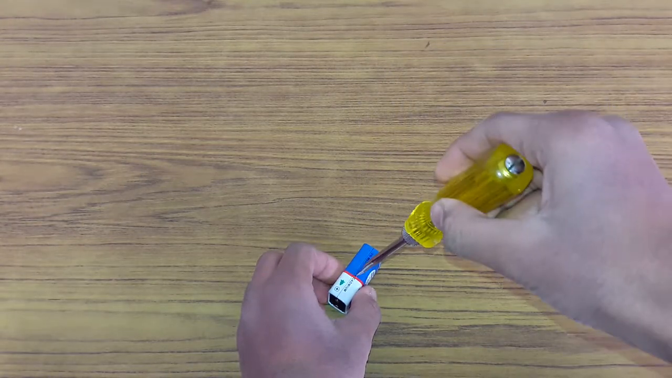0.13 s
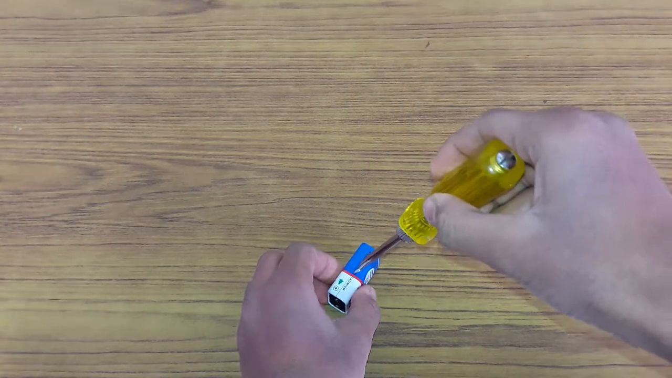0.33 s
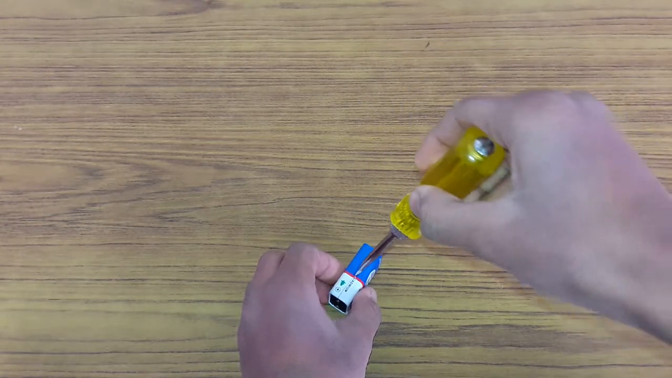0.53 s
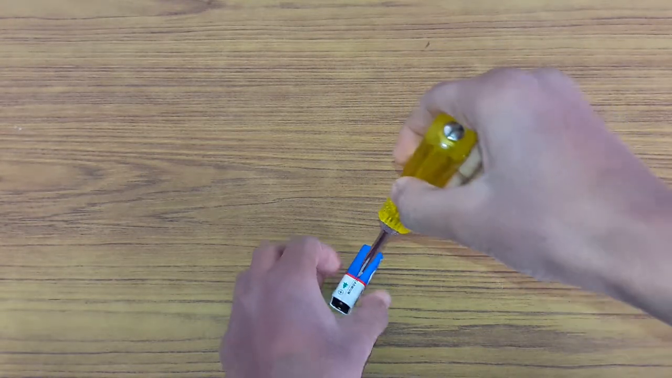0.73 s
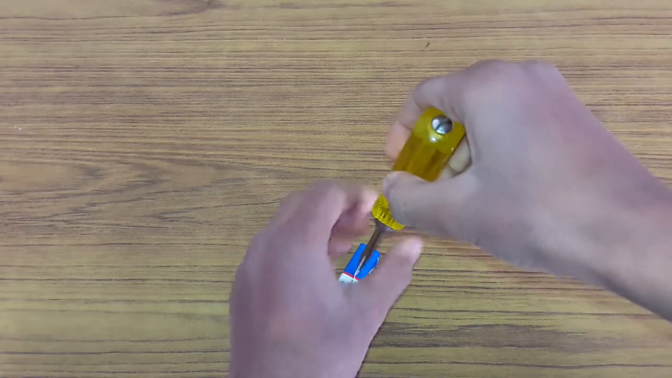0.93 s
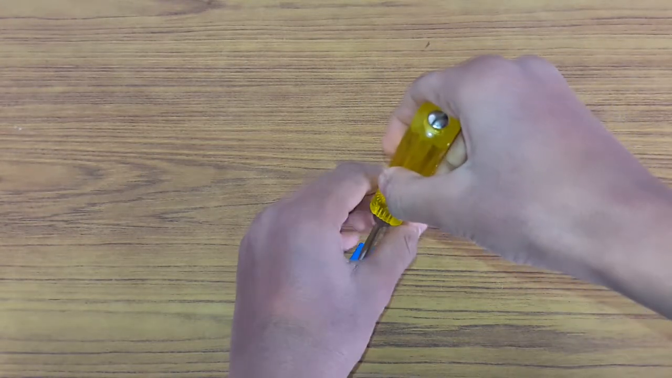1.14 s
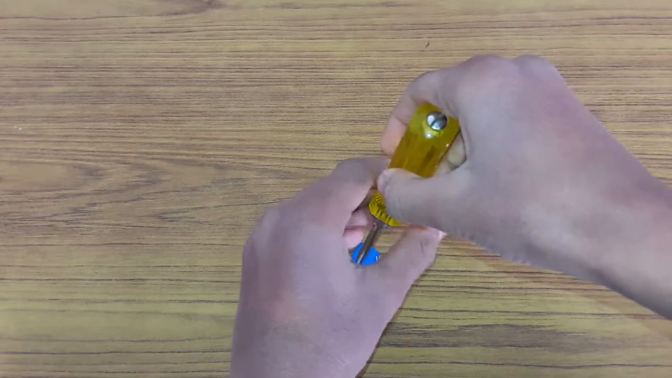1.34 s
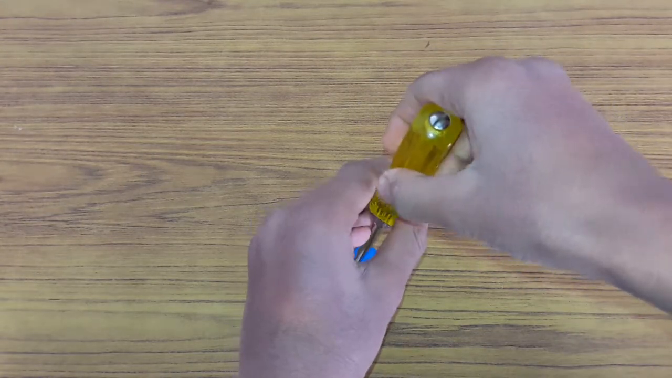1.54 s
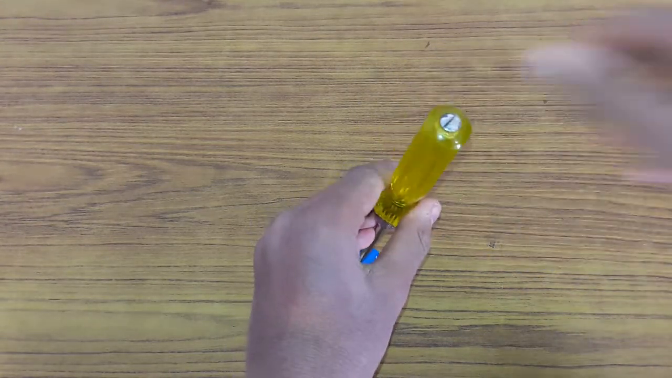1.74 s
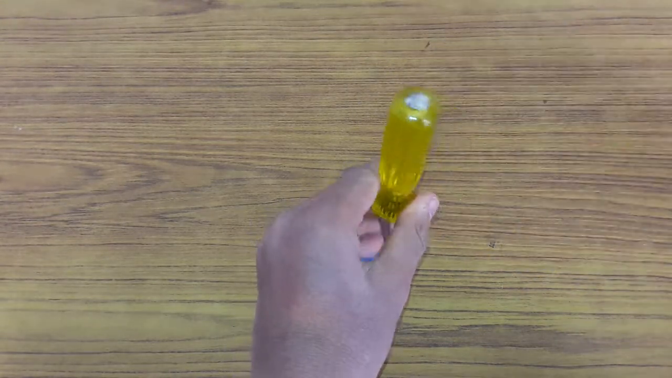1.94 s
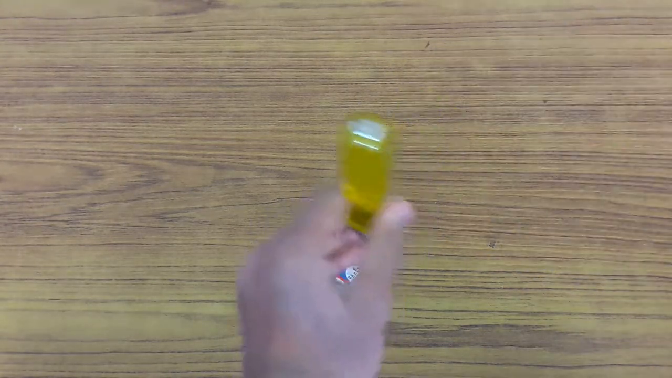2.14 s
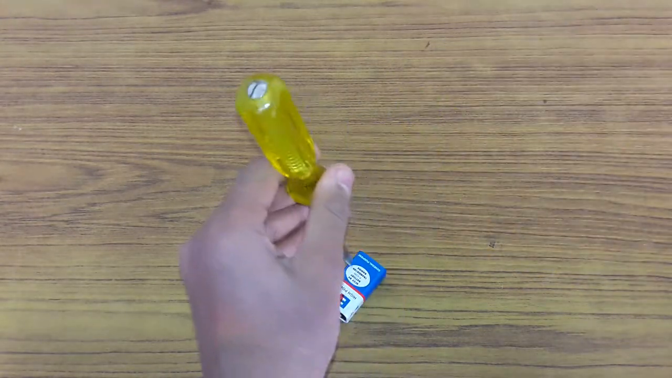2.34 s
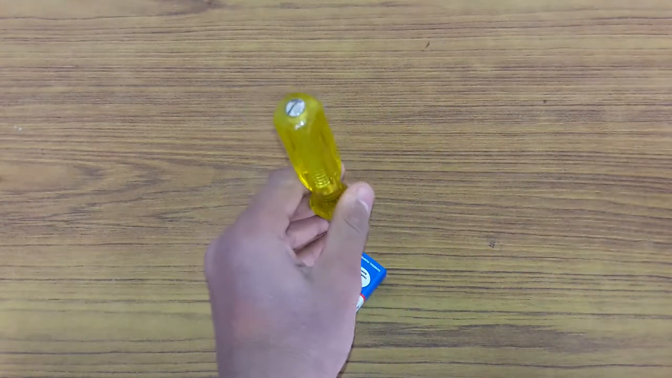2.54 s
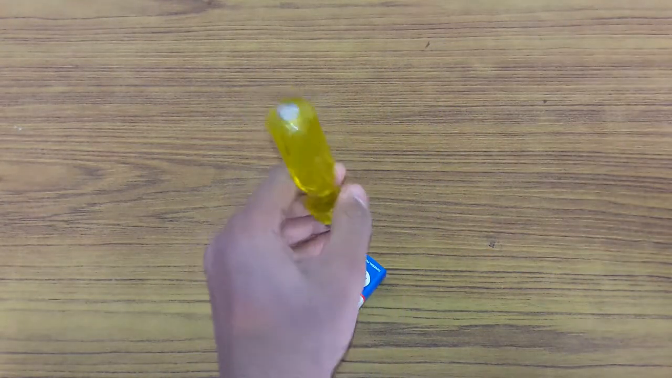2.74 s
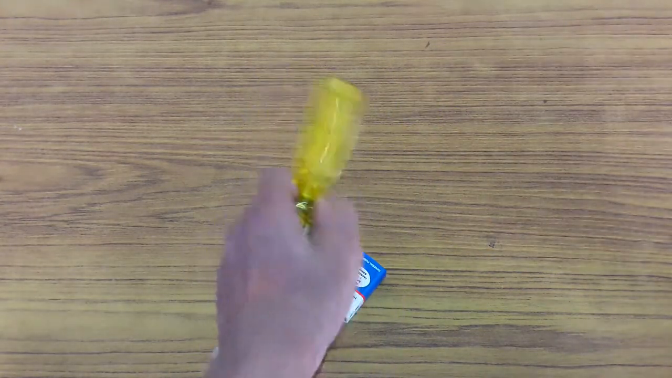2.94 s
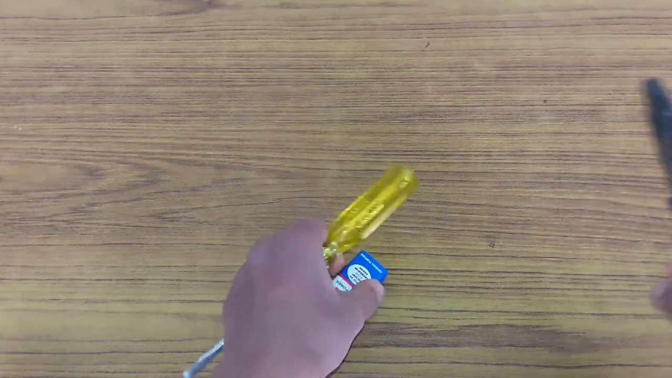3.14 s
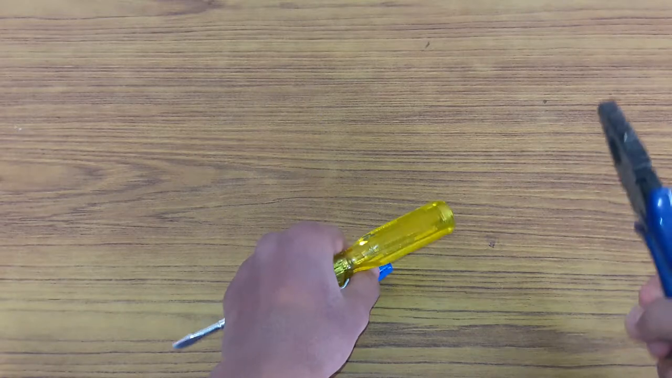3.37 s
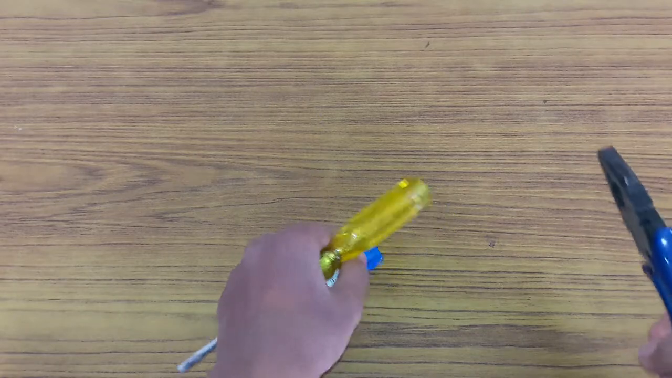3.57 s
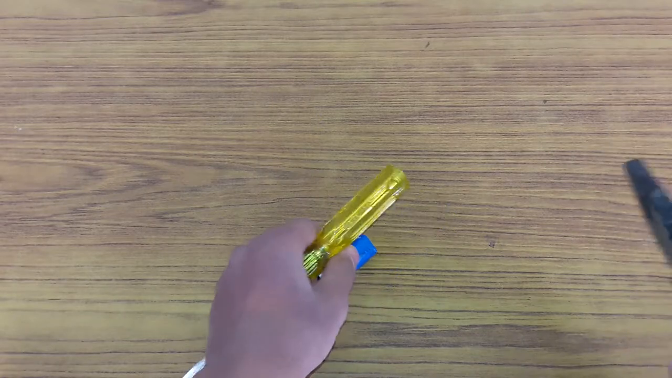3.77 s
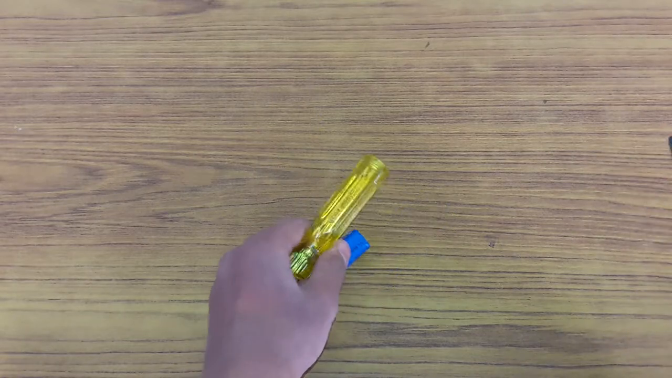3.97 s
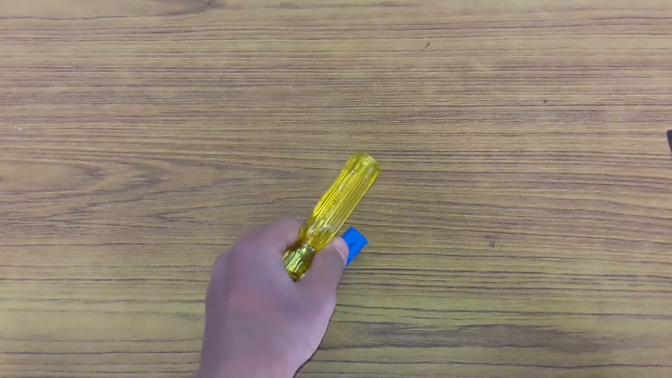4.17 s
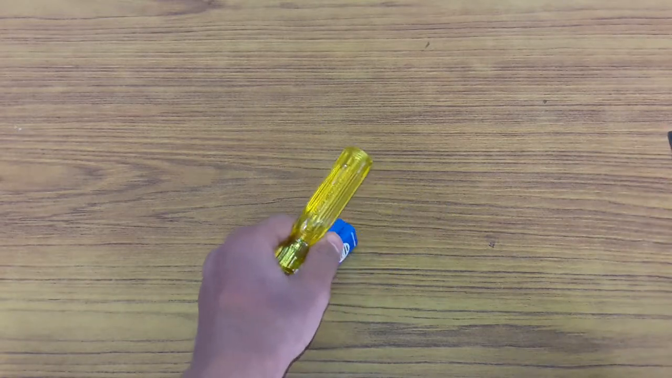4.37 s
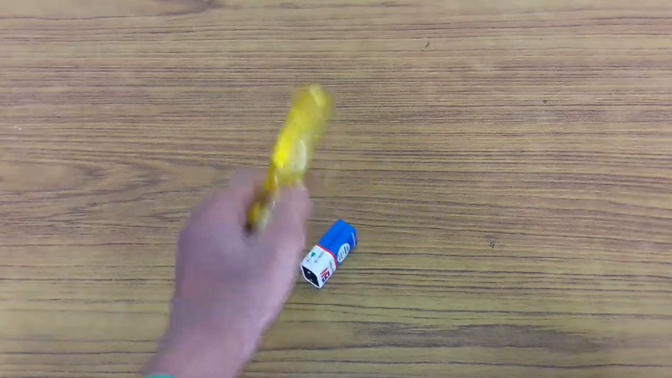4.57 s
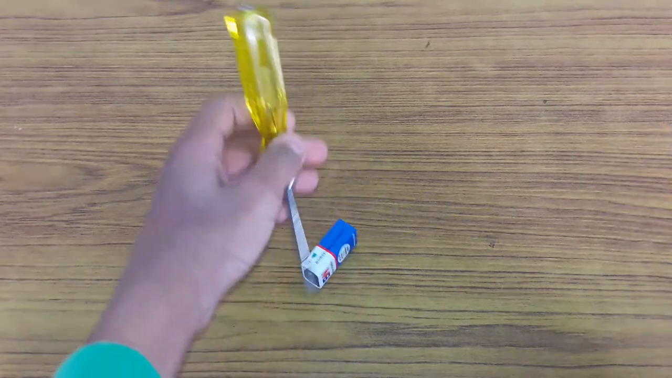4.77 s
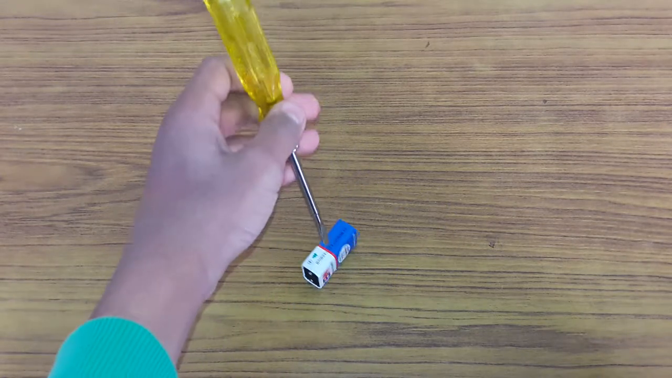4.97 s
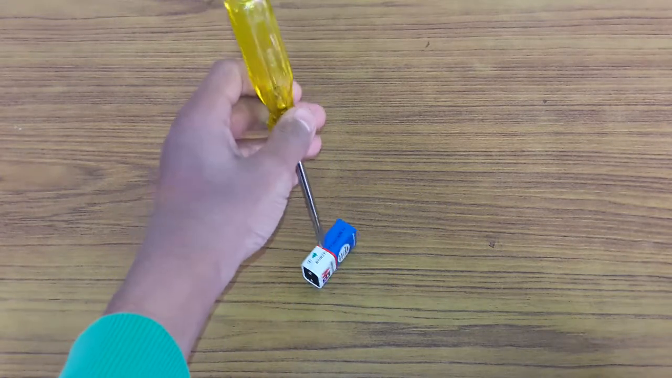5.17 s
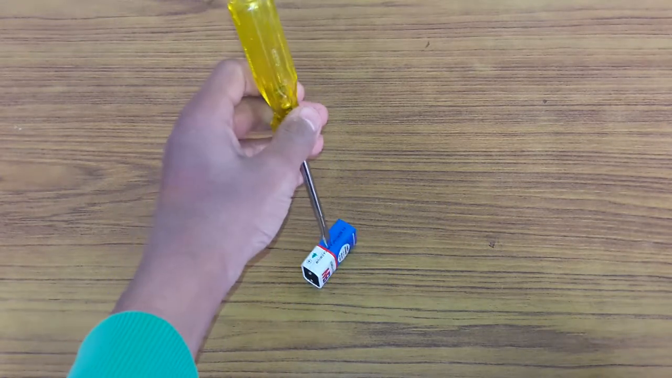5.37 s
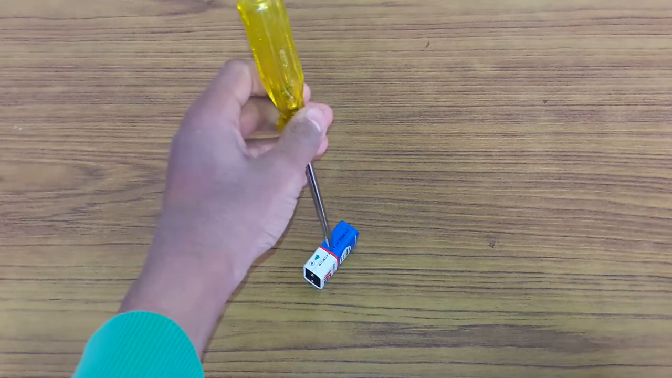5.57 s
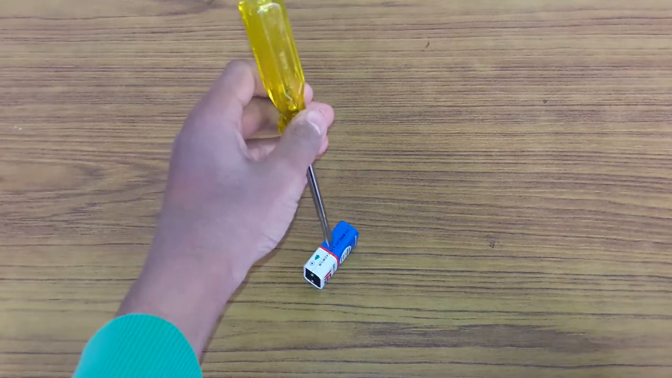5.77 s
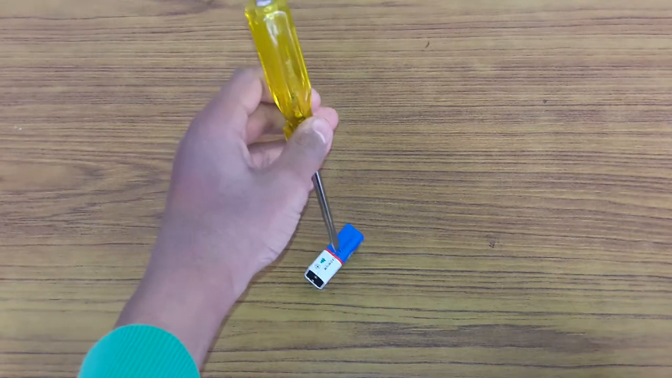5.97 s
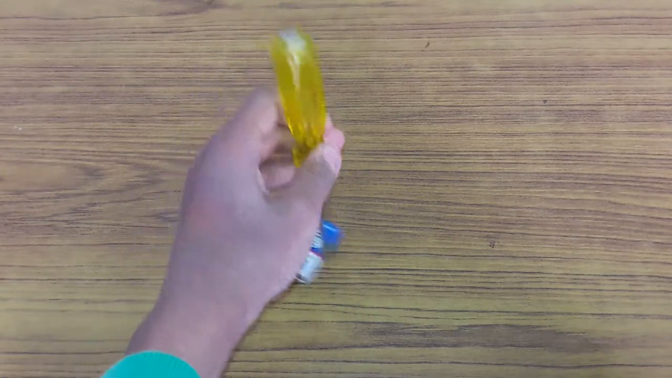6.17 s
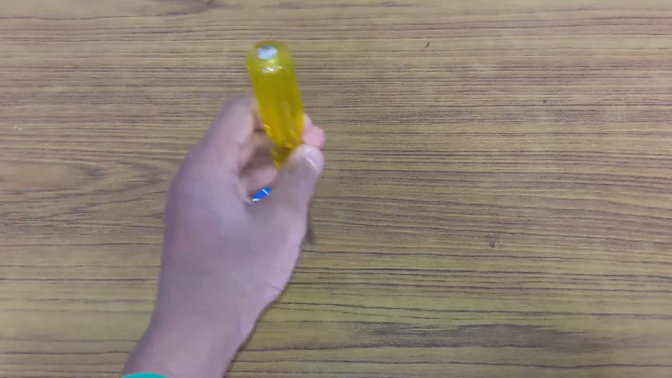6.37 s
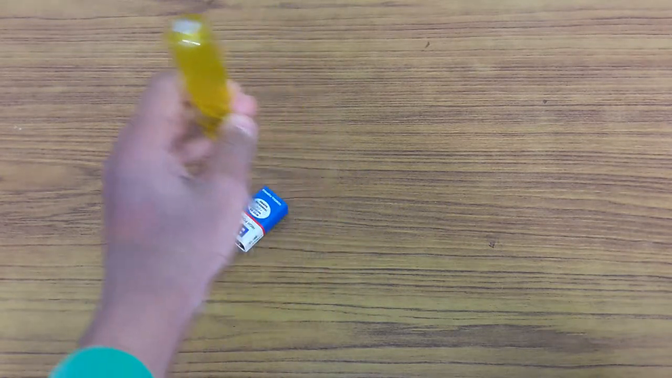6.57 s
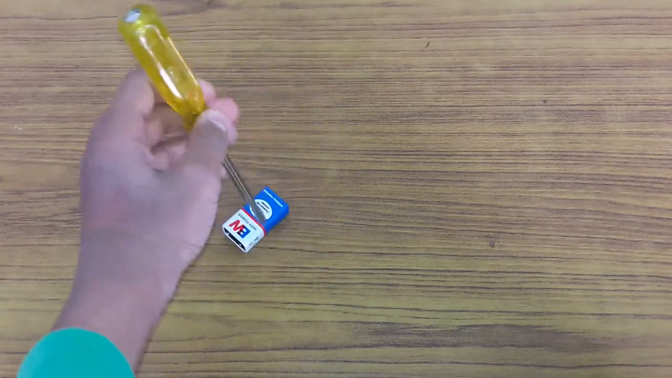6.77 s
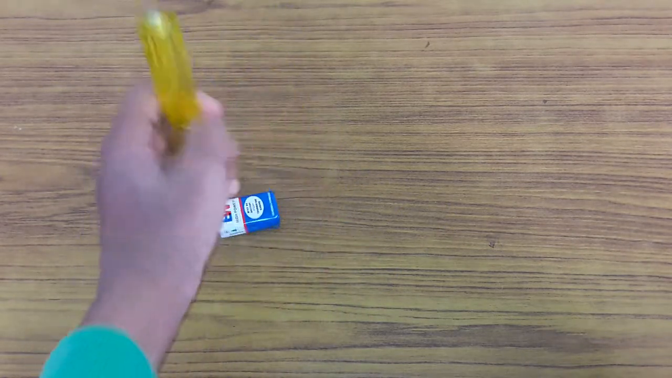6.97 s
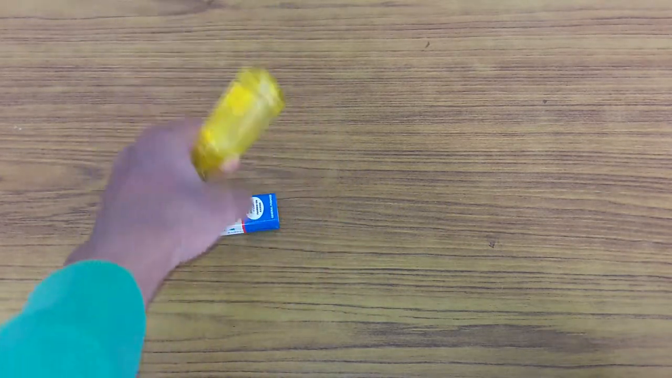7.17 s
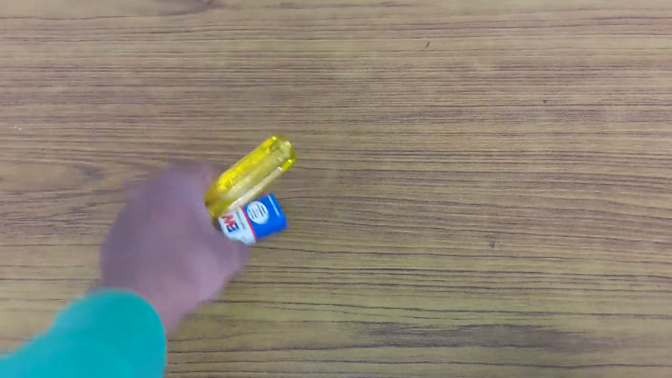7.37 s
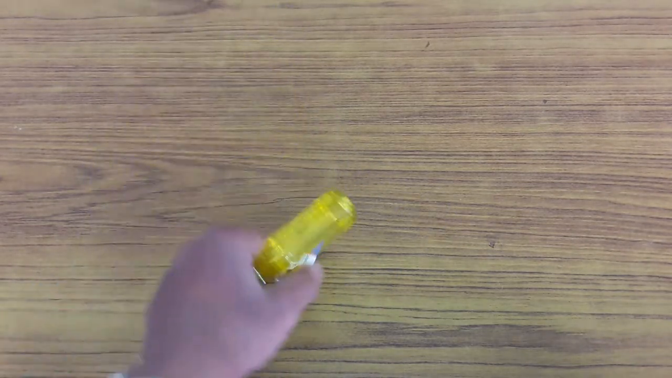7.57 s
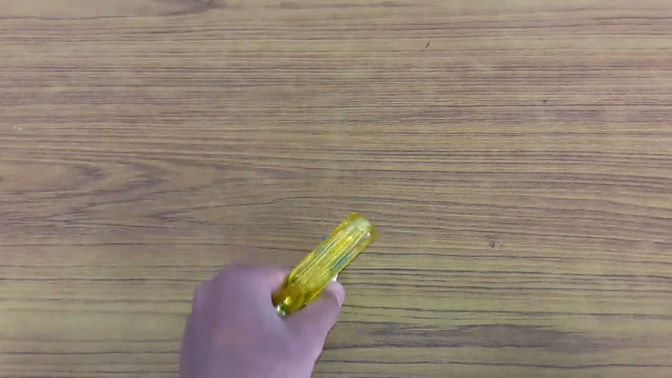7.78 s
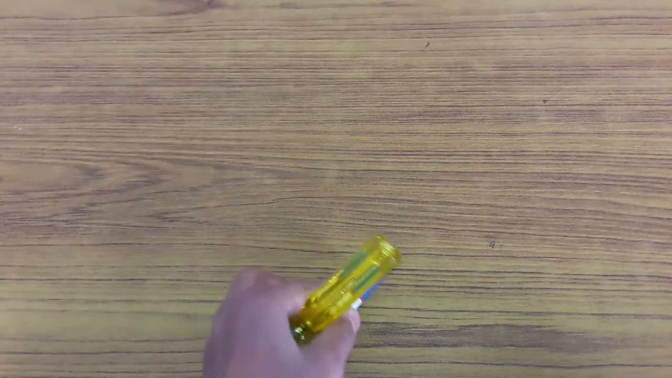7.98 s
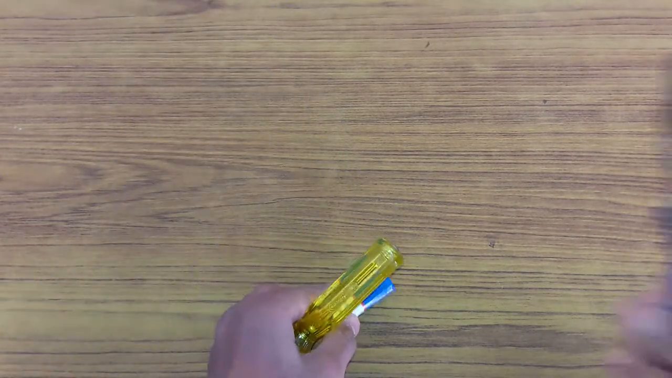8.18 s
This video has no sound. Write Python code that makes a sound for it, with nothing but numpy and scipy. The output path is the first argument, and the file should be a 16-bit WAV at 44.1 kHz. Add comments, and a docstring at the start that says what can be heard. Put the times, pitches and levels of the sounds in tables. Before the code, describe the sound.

Close by in an echoing, quietly humming room, a metal battery casing and a screwdriver knock and slide on a wooden tabletop, the steel tip ticking and scratching. The knocks come in uneven clusters, easing midway into gentle, regular taps as a faint two-tone horn sounds far outside. The scraping and clatter return with one hard knock, and two small metallic clinks finish.

```python
"""Prying at a battery casing

A screwdriver pries at a small metal battery casing on a wooden table in an echoing room.
Casing and tool knock and slide on the wood, and the steel tip ticks and scratches. Hollow notes
sound among a run of even taps, and near the end the loosened casing clinks twice.
Outside, a far two-tone vehicle horn sounds once; the room hums quietly."""
import sys
import numpy as np
from scipy import signal
from scipy.fft import rfft, irfft, next_fast_len
from scipy.io import wavfile
from scipy.ndimage import uniform_filter1d, map_coordinates

SR = 44100
rng = np.random.default_rng(int(sys.argv[2]) if len(sys.argv) > 2 else 0)


def output_pcm(signal):
    """Save a mono or channel-first signal as 16-bit PCM at the path in sys.argv[1].

    Samples are clipped to [-1, 1] before scaling.
    """
    pcm = np.clip(np.atleast_2d(signal).T, -1, 1) * 32767
    wavfile.write(sys.argv[1], SR, np.round(pcm).astype(np.int16))


N = 362061

# A mode is a pitch at which an object likes to ring; a wider one dies away sooner.
# The modes of each object: pitch_hz, width_hz, level_db
BOARD_MODES = [(302, 76, -5), (380.5, 61.5, -1.5), (435, 78, 1.5), (488.2, 62.5, 1.5), (583, 66, 2),
               (665, 105, 0), (790, 108, -8)]  # wooden table top
FRAME_MODES = [(100, 18, -2), (160.7, 21, -2), (191.6, 31.5, 7.5), (241.7, 26.8, 6)]  # table frame
CASING_MODES = [(857, 96, 1.5), (1032, 150, -2), (1162, 84, -4), (1219, 140, -4), (1379, 73, -3.5)]  # battery body
SHELL_MODES = [(1677, 120, 12.5), (1828, 180, 11.5), (1978, 130, 5.5), (2216, 170, 7), (2683, 140, 1.5),
               (3070, 470, -5)]  # thin wall of the casing
STEEL_MODES = [(3535, 500, 4), (4100, 2200, 20), (4465, 360, -1), (5620, 1610, -2.5), (6060, 1100, 1),
               (8190, 1100, -1.5)]  # screwdriver blade and shaft
# Blows on the table: start_s, level_db, board_hz, frame_db, casing_db, casing_hz, shell_db, shell_hz,
# echo_db (the share sent to the walls). The later levels are relative to level_db.
KNOCKS = [(0.097, -35, 408, 2, -25, 930, -44, 2200, -0.5), (0.367, -33, 480, -11, -19, 950, -44, 1770, -3),
          (0.791, -54.5, 636, -12, -12, 1150, -2.5, 2200, -1.5),
          (1.275, -46, 604, -9, -3.5, 920, -16, 1700, -3.5), (1.414, -39, 620, -10, -3, 923, -13, 1690, 2),
          (1.579, -45.5, 404, -6.5, -30, 907, -19, 1790, 3),
          (1.952, -23, 537, -4.5, -17, 1000, -20, 2340, -1.5),
          (2.02, -41.5, 570, -16, 2, 974, -7.5, 2180, 5), (2.101, -39, 412, 1, -21, 895, 3, 1660, 2),
          (2.138, -27.5, 396, -45, -3.5, 1200, -7.5, 1680, 0),
          (2.162, -28, 440, -29, -33, 1220, -29, 1660, 4),
          (2.32, -32.5, 413, -1, -3.5, 1155, -30, 1610, -1.5),
          (2.431, -43, 295, -7, 0.5, 1160, -11, 2860, 11.5),
          (2.45, -27.5, 410, 1, -29, 1170, -15.5, 1750, 3),
          (2.4991, -10.5, 520, -24, -13.5, 1410, -6, 2270, -0.5),
          (2.733, -6, 500, -20, -17.5, 836, -40, 1930, -5), (2.748, -18, 545, -45, 4.5, 883, 0.5, 1720, -7),
          (2.805, -15.5, 660, -10, -35, 904, -20, 1840, -16),
          (2.935, -27, 463, -15, -29, 950, -17, 1886, -17),
          (3.2, -39.5, 794, -13.5, 6.5, 994, 2.5, 1690, 1.5),
          (3.305, -40, 385, -30.5, 2, 1090, -15, 1800, 0.5),
          (3.624, -39, 493, -19, -12, 1110, -16, 1660, 5.5),
          (3.877, -30, 406, -41, -8.5, 1320, -10, 1640, 3), (3.905, -28, 508, -9, -7.5, 888, -21, 1640, 0),
          (4.367, -47, 423, -16, -1.5, 1294, -29, 1660, 11.5),
          (4.398, -35, 400, -37, -3, 1130, -1.5, 1710, 2.5),
          (4.631, -39.5, 404, -33, -19, 950, -29, 1680, 5),
          (4.648, -36.5, 398, -28, -2.5, 1327, -4.5, 1820, 2),
          (4.871, -34.5, 604, -17, -2.5, 1140, -5, 1670, -0.5),
          (5.071, -39, 577, -22.5, -1, 1116, -2.5, 1680, 2),
          (5.263, -37, 487, -23, -3, 1210, -5, 1810, -0.5),
          (5.449, -42.5, 515, -21, -7.5, 1430, -8.5, 1640, 2),
          (5.567, -36.5, 350, -10, -32, 1370, -16, 2310, -3),
          (5.595, -28.5, 442, -4.5, -30, 1175, -14.5, 2280, -6),
          (5.608, -35.5, 450, -9, -18, 980, -31, 2280, 4),
          (6.268, -31.5, 480, -14.5, -5, 1160, -23, 1720, 4.5),
          (6.31, -27, 416, -20, -27, 930, -3, 2050, 6.5),
          (6.373, -27.5, 400, -28, -7.5, 864, -24, 1640, 7.5),
          (6.406, -28.5, 390, -32, -4, 1210, -5.5, 1600, 3),
          (6.762, -21.5, 594, -8, -14.5, 913, -15.5, 2410, -3.5),
          (6.894, -27, 470, -13, -38, 1080, -13.5, 2460, -5),
          (6.946, -3.5, 480, -18, -11.5, 1220, -13, 2020, 0.5),
          (7.41, -35.5, 425, -39, 2.5, 1170, -31, 1670, -0.5),
          (7.512, -55.5, 444, -21, 20.5, 1120, -8, 1660, 6.5), (7.7, -27, 493, -17, 0, 1000, -3.5, 1690, 5),
          (8.032, -44.5, 460, -13, 9.5, 1190, 6, 2200, 4)]


def knocks(contact_s=0.0006):
    """Each blow rings the table, casing and blade. Returns the direct sound and the share for the walls."""
    track = np.zeros((2, N))
    for start_s, db, board_hz, frame_db, casing_db, casing_hz, shell_db, shell_hz, echo_db in KNOCKS:
        rest_s = contact_s * amp(-0.21 * (db + 17))  # a weak blow rests longer on the wood
        board = ring(BOARD_MODES, rest_s, board_hz, focus_db=25.5)
        frame = amp(frame_db) * ring(FRAME_MODES, 3 * contact_s)
        shell = amp(shell_db) * ring(SHELL_MODES, contact_s / 2, shell_hz, focus_db=59)
        blade = amp(shell_db - 26.5) * ring(STEEL_MODES, .00015, struck_hz=3540, focus_db=24, flip=-1)
        casing = amp(casing_db) * ring(CASING_MODES, contact_s, casing_hz, focus_db=104)
        place(track, start_s, amp([[db], [db + echo_db]]) * (board + frame + shell + blade + casing))
    return track


# The very high ring of the tip on metal: pitch_hz, width_hz, level_db
BRIGHT_MODES = [(10040, 2800, 4), (10200, 1500, -12.5), (13200, 2000, 6), (14400, 1600, 0.5)]
# Strikes of the tip: start_s, level_db, pitch_hz, bright_db, echo_db (last two relative to level_db)
TIP_TICKS = [(0.093, -55.5, 5550, -18, -5), (0.792, -64, 3690, -10, -13), (1.742, -68, 3320, -13, -13.5),
             (1.951, -41, 4600, -10, -4), (2.101, -34, 5200, -20, -10.5), (2.136, -35, 4000, -9.5, -21),
             (2.431, -25, 7300, -14, -6.5), (2.441, -26, 7300, -5.5, -5.5), (2.4985, -28, 3440, -36, -12.5),
             (2.733, -33.5, 5500, -14.5, -14), (2.748, -45, 4000, -15, -8), (2.936, -36, 4200, -8, -12),
             (3.305, -63.5, 6960, -15, -16), (4.397, -70, 4690, -11, -4), (5.532, -62, 3800, -26.5, -12),
             (5.567, -52, 4000, -30, -9), (5.575, -61, 4000, -33, -10), (5.583, -68, 4000, -33, -7),
             (5.589, -63, 3900, -39, -10), (5.595, -48, 3900, -33, -8), (5.602, -53, 4000, -35, -7),
             (5.608, -49, 3870, -28, -16), (5.614, -64, 4000, -37, -13), (6.266, -39, 7000, 3, -7),
             (6.307, -40.5, 5000, -8, -19), (6.371, -51, 6000, 0, -16), (6.41, -38, 4500, -5, -12),
             (6.762, -39, 6000, -9, -8.5), (6.879, -56, 3600, -27, -14), (6.917, -59, 5000, -9, -10),
             (6.948, -29, 4560, -12.5, -6), (7.372, -70, 6760, 3, -10), (7.405, -63, 7000, -6, -10),
             (7.474, -42.5, 7000, -15, 2), (7.508, -33, 7500, -6, -12), (7.516, -45, 7400, -22, -10),
             (7.699, -40.5, 4080, -25, -8), (8.031, -40, 3700, -14, -9.5)]


def tip_ticks(chatter_s=0.009):
    """The tip strikes metal and rings the blade. It chatters close by; the walls get the plain tick."""
    direct, to_walls = np.zeros((2, N))
    t = np.arange(SR // 100) / SR
    for start_s, db, pitch_hz, bright_db, echo_db in TIP_TICKS:
        focus_db = -0.5 - .8 * bright_db  # a duller tick rings fewer modes
        tick = ring(STEEL_MODES, .00016, pitch_hz, focus_db, flip=-1)
        tick += amp(bright_db) * ring(BRIGHT_MODES, .00015, flip=-1)
        chatter = rng.standard_normal(len(t)) * amp(-60 * t / chatter_s)
        rattled = signal.fftconvolve(tick, chatter / np.linalg.norm(chatter))[:len(tick)]
        place(direct, start_s, amp(db) * rattled)
        place(to_walls, start_s, amp(db + echo_db) * tick)
    return np.array([direct, to_walls])


# Strokes over the table: start_s, rise_s, hold_s, board_db, casing_db, shell_db, steel_db
# (last three relative to board_db)
SLIDES = [(2.08, 0.027, 0.032, -34, -8, -11.5, -39), (2.65, .04, 0.012, -42.5, 2.5, 0.5, -18.5),
          (3.22, 0.076, .02, -43.5, -6.5, -22, -49), (6.1, 0.014, .02, -77, 12, -21, -29),
          (6.16, 0.07, 0.026, -46, 0, -6.5, -30), (6.24, 0.036, 0.1, -40, -1, -5.5, -21.5),
          (6.8, 0.054, 0.06, -53, -6, -10, -27), (6.88, .04, 0.058, -53, -11, 4, -10.5),
          (7.35, 0.034, 0.021, -55, 2, -4, -14), (7.45, .05, 0.01, -57.5, 10.5, 11.5, 0),
          (7.49, 0.06, 0.13, -49.5, 4.5, -7.5, -52)]


def slides():
    """Metal drags over the wood grain, and a stream of tiny catches shakes every object."""
    gains = 0
    for start_s, rise_s, hold_s, board_db, *shares_db in SLIDES:
        stroke_db = board_db + swell(start_s, rise_s, hold_s, rise_db=28.5, fade_db_per_s=172.5)
        gains += amp(stroke_db) * amp([0, *shares_db])[:, None]
    board_gain, casing_gain, shell_gain, steel_gain = gains
    catches = unit(grit(per_s=4000) * amp(2 * wobble(40)))
    skips = catches + unit(grit(per_s=250))  # the hard tip also skips in single ticks
    table = shake(BOARD_MODES, catches) + amp(-29) * shake(FRAME_MODES, catches)
    casing = shake(CASING_MODES, catches)
    shell = shake(SHELL_MODES, catches)
    steel = unit(shake(STEEL_MODES, skips, order=1) + amp(-14.5) * shake(BRIGHT_MODES, skips))
    return board_gain * table + casing_gain * casing + shell_gain * shell + steel_gain * steel


# Hollow wooden notes among the even taps: start_s, level_db, pitch_hz
HOLLOW_NOTES = [(4.449, -47, 348), (4.505, -35.5, 392), (4.728, -42.5, 373), (4.773, -40, 348),
                (4.838, -53, 391), (4.935, -39.5, 348), (4.975, -48, 358), (5.132, -42, 353),
                (5.188, -48, 349), (5.352, -47, 353), (5.531, -44.5, 334)]


def hollow_notes(width_hz=22, echo_db=-9):
    """Wood rings softly at one pitch, with a weaker one just above it."""
    track = np.zeros(N)
    for start_s, db, pitch_hz in HOLLOW_NOTES:
        modes = [(pitch_hz, width_hz, 0), (1.186 * pitch_hz, 2 * width_hz, -8)]
        place(track, start_s, amp(db) * ring(modes, attack_s=.003))
    return track * amp([[0], [echo_db]])


# Modes of the loosened casing: pitch_hz, width_hz, level_db
LOOSE_MODES = [(1148, 9.5, -0.5), (2180, 11, -7.5), (3190, 16, -13), (3800, 36, -10.5)]
# When it clinks: start_s, level_db
CLINKS = [(7.7, -46), (8.03, -39.5)]


def clinks(echo_db=-6.5):
    """The loosened casing is free to ring, so its notes last longer."""
    track = np.zeros(N)
    for start_s, db in CLINKS:
        place(track, start_s, amp(db) * ring(LOOSE_MODES, attack_s=.0004))
    return track * amp([[0], [echo_db]])


# Bounces off the nearest surfaces: delay_s, level_db
FIRST_ECHOES = [(.0075, -15.5), (.016, -16.5), (.031, -7)]
# How long the echo takes to fall by 60 dB: pitch_hz, fade_s
WALL_FADE = [(100, 0.73), (500, 0.73), (2000, 0.73), (5000, 0.72), (8000, 0.53), (15000, 0.4)]


def room_echo(sound, build_s=0.0018):
    """Hard walls give a few quick bounces, then a long tail whose treble dies first."""
    early = sum(amp(db) * np.pad(sound, (round(delay_s * SR), 0))[:N] for delay_s, db in FIRST_ECHOES)
    hop = 8192
    count = N // hop + 2
    # Hands and objects move, so each stretch of sound gets its own tail of fading noise.
    hz, t, noise = signal.stft(rng.standard_normal((count, SR)), SR, nperseg=256)
    fade = amp(-60 * t / along(WALL_FADE, hz)[:, None])
    tails = signal.istft(noise * fade, SR, nperseg=256)[1][:, :SR]
    tails *= 1 - np.exp(-np.arange(SR) / SR / build_s)  # echoes thicken at first
    tails /= np.linalg.norm(tails, axis=1).mean()
    padded = np.pad(sound, (hop, (count + 1) * hop))
    window = np.sin(np.pi * np.arange(2 * hop) / (2 * hop))
    late = np.zeros(hop + N)
    for k, tail in enumerate(tails):
        stretch = padded[k * hop:][:2 * hop] * window
        place(late, k * hop / SR, signal.fftconvolve(stretch, tail))
    return early + amp(5.5) * late[hop:]


# The horn's tone as heard through the window: pitch_hz, level_db
HORN_TONE = [(2500, -36), (2800, -9), (2950, -0.5), (3160, 7.5), (3500, -1), (3850, -10), (4250, -19),
             (4700, -28), (7000, -39)]


def far_horn(start_s=4.796, reeds_hz=(351.1, 422.6)):
    """Two reeds buzz together; only overtones near the pitch at which the horn's mouth rings carry."""
    size = 2 * SR
    t = np.arange(size) / SR
    smear = lambda per_s: wobble(per_s, size) + 1j * wobble(per_s, size)
    tone = np.zeros(size)
    for reed_hz in reeds_hz:
        for hz in reed_hz * np.arange(6, 17):
            paths = .6 + smear(40) + .22 * smear(260)  # shifting street echoes blur each overtone
            tone += amp(along(HORN_TONE, hz)) * np.real(paths * np.exp(2j * np.pi * hz * t))
    track = np.zeros(N)
    place(track, start_s, unit(tone))
    return track * amp(-56.5 + swell(start_s, rise_s=0.17, hold_s=0.24, rise_db=22, fade_db_per_s=49))


# Loudness of a thin, far tone: time_s, level_db
WHISTLE_LEVELS = [(1.6, -85), (1.66, -81), (1.9, -87), (1.96, -110)]


def faint_whistle(pitch_hz=2770):
    """One brief, pure tone whose level flickers."""
    level_db = over_time(WHISTLE_LEVELS, outside=-140) + 3 * wobble(20)
    return amp(level_db) * np.sin(2 * np.pi * pitch_hz * np.arange(N) / SR)


# Loudness of the room and street hum: time_s, level_db
HUM_LEVELS = [(0, -54), (.7, -58.5), (1.9, -58), (3.6, -56.5), (4.4, -55.5), (5.5, -56.5), (6.1, -57.5),
              (8.21, -54)]
# Its tone: pitch_hz, level_db
HUM_TONE = [(15, -53.5), (25, -20), (44, 2.5), (144, -3.5), (274, -12), (306, -8), (366, -12), (533, -9),
            (927, -20.5), (2010, -28.5), (5000, -42.5), (6500, -70), (11000, -120)]


def room_hum():
    """Low room and street noise that comes and goes in patches."""
    noise = signal.stft(rng.standard_normal(N), nperseg=1024)[2]
    patches = uniform_filter1d(rng.standard_normal(noise.shape), size=8, axis=0)  # smooth over pitch
    patches = uniform_filter1d(patches, size=6, axis=1)  # and over time
    patchy = signal.istft(noise * amp(1.3 * unit(patches)), nperseg=1024)[1][:N]
    level_db = over_time(HUM_LEVELS) + 1.3 * wobble(1.9)
    return amp(level_db) * unit(filtered(patchy, lambda hz: amp(along(HUM_TONE, hz))))


# Tone of the microphone's hiss: pitch_hz, level_db
HISS_TONE = [(2940, -41.5), (5000, -10.5), (5950, -3), (7460, -20.5), (8050, -9), (11500, -8.5), (15800, 9)]


def hiss():
    """The microphone adds a faint, steady, high noise."""
    return amp(-75) * unit(filtered(rng.standard_normal(N), lambda hz: amp(along(HISS_TONE, hz))))


def ring(modes, attack_s, struck_hz=None, focus_db=0, flip=1):
    """One blow: each mode is a fading sine wave, a little different every time. The peak is 1."""
    t = np.arange(SR // 8) / SR
    hz, width_hz, db = np.transpose(modes)[:, :, None]
    if struck_hz:  # modes far from the pitch of the struck spot are weaker
        db = db - focus_db * np.log2(hz / struck_hz) ** 2
    db = db + 2 * rng.standard_normal(db.shape)
    hz = hz * (1 + .012 * rng.standard_normal(hz.shape))
    sign = flip ** np.arange(len(modes))[:, None]  # flip=-1 avoids gaps in the tone between modes
    waves = sign * amp(db) * np.exp(-np.pi * width_hz * t) * np.sin(2 * np.pi * hz * t)
    blow = waves.sum(axis=0) * (1 - np.exp(-t / attack_s)) ** 2  # a softer contact swells more slowly
    return blow / np.abs(blow).max()


def shake(modes, force, order=2):
    """A force keeps the modes ringing; order 2 leaves deeper dips between them than order 1."""
    def response(hz):
        total = 0
        for k, (pitch_hz, width_hz, db) in enumerate(modes):
            peak = 1j * hz * width_hz / (pitch_hz ** 2 - hz ** 2 + 1j * hz * width_hz)
            total += amp(db) * ((-1) ** k * peak) ** order
        return total
    return unit(filtered(force, response))


def grit(per_s, spread_db=2):
    """Random catches on a rough surface, a few much stronger than the rest."""
    caught = rng.random(N) < per_s / SR
    return caught * amp(spread_db * rng.exponential(size=N)) * rng.standard_normal(N)


def swell(start_s, rise_s, hold_s, rise_db, fade_db_per_s):
    """A level in dB that rises to 0, holds, then fades."""
    t = np.arange(N) / SR - start_s
    rising_db = np.where(t < 0, -140, rise_db * (t / rise_s - 1))
    return np.minimum(np.minimum(rising_db, 0), -fade_db_per_s * (t - rise_s - hold_s))


def wobble(per_s, size=N):
    """A smooth curve through per_s random values a second."""
    values = rng.standard_normal(int(size * per_s / SR) + 4)
    return map_coordinates(values, [np.arange(size) * per_s / SR])


def filtered(sound, response):
    """Scale each frequency of a sound by response(hz)."""
    size = next_fast_len(N + SR // 2)
    return irfft(rfft(sound, size) * response(np.fft.rfftfreq(size, 1 / SR)), size)[..., :N]


def place(track, start_s, sound):
    """Add a sound to a track, cutting off what does not fit."""
    slot = track[..., round(start_s * SR):][..., :sound.shape[-1]]
    slot += sound[..., :slot.shape[-1]]


def along(points, hz):
    """Read between the rows of a (pitch_hz, value) table."""
    pitches_hz, values = np.transpose(points)
    return np.interp(np.log(hz + 1), np.log(pitches_hz + 1), values)


def over_time(points, outside=None):
    """Turn a (time_s, value) table into one value per sample."""
    return np.interp(np.arange(N) / SR, *np.transpose(points), outside, outside)


def amp(db):
    """Turn decibels into a gain."""
    return 10 ** (np.asarray(db) / 20)


def unit(sound):
    """Scale a sound to an average power of 1."""
    return sound / np.sqrt(np.mean(sound ** 2) + 1e-20)


def scene():
    """The work on the table, its echo and the background, in one channel."""
    direct, to_walls = knocks() + tip_ticks() + hollow_notes() + clinks()
    scraping = slides()
    echo = room_echo(to_walls + amp(-10) * scraping)
    return (direct + scraping + echo + far_horn() + faint_whistle() + room_hum() + hiss())[None]


# How strongly the microphone hears each pitch: pitch_hz, gain_db
MIC_TONE = [(20, -20), (45, -16), (90, -9), (130, -0.5), (6000, 1), (7600, 15.5), (8000, -2), (11000, 8),
            (16000, -5)]


def record(dry):
    """The microphone weakens deep bass, peaks just below 8 kHz and hears nothing above top_hz."""
    top_hz, resting_level = 15850, -.0006
    return resting_level + filtered(dry, lambda hz: amp(along(MIC_TONE, hz)) * (hz < top_hz))


dry = scene()
out = record(dry)
output_pcm(out)
```